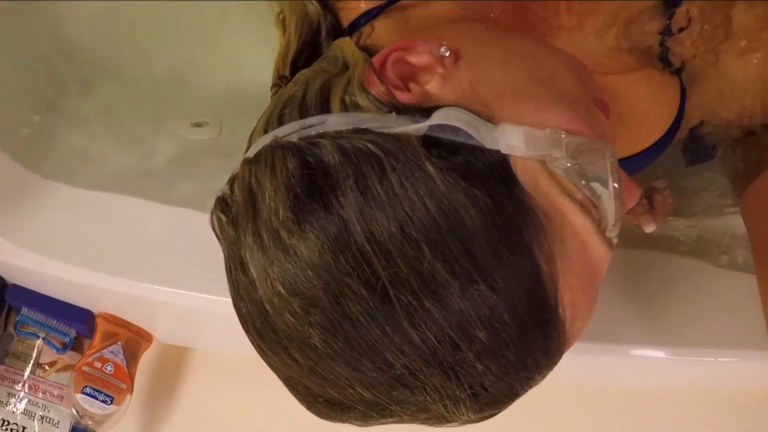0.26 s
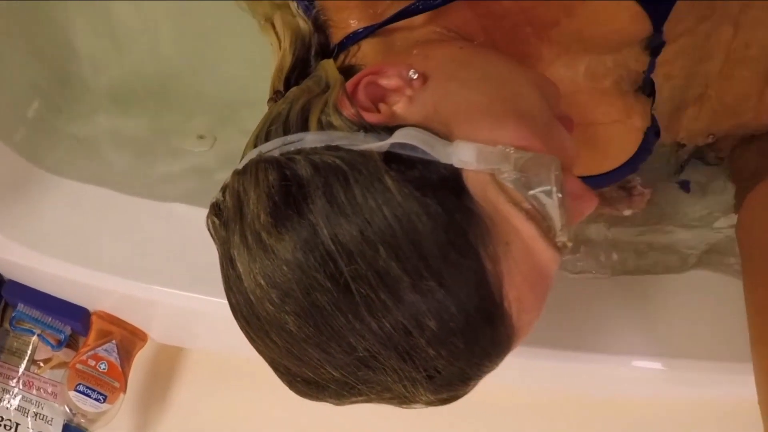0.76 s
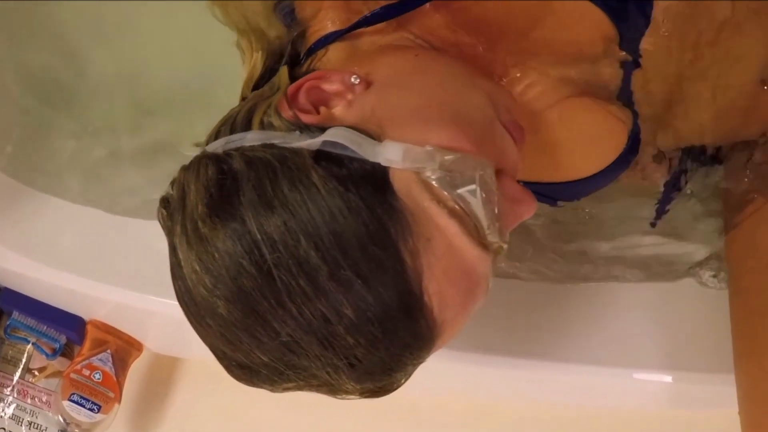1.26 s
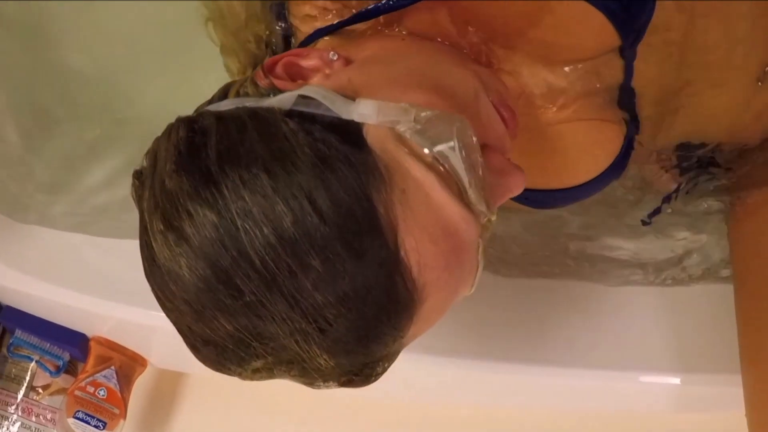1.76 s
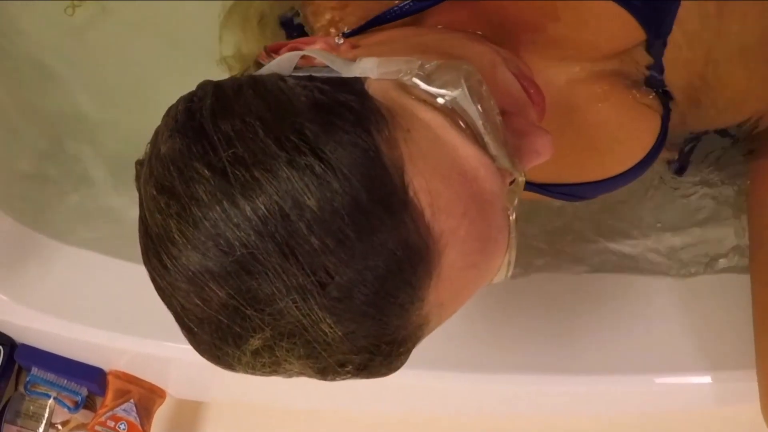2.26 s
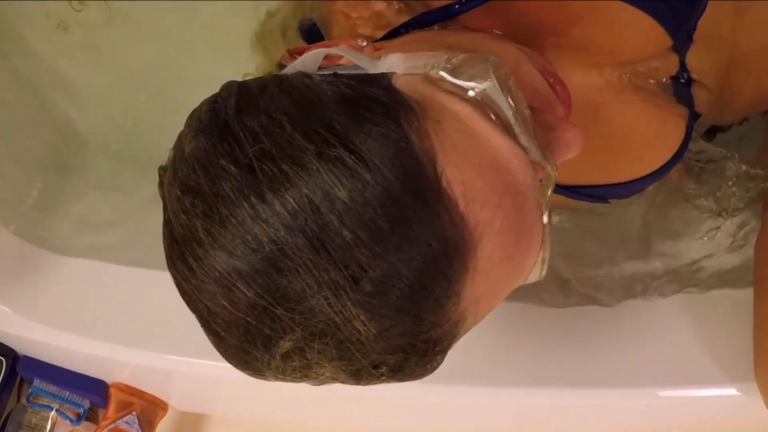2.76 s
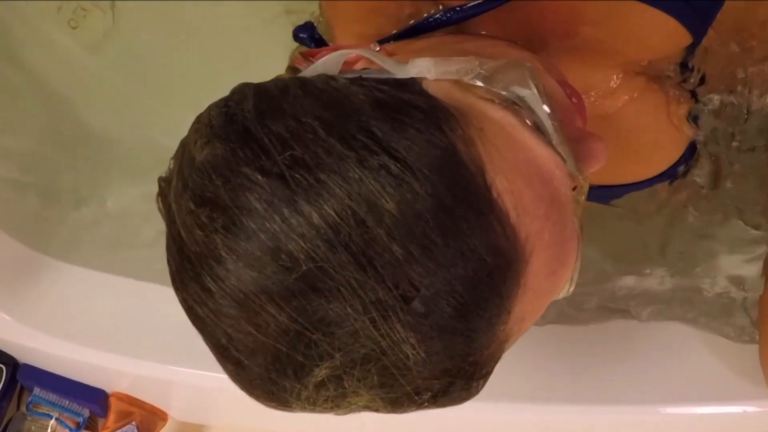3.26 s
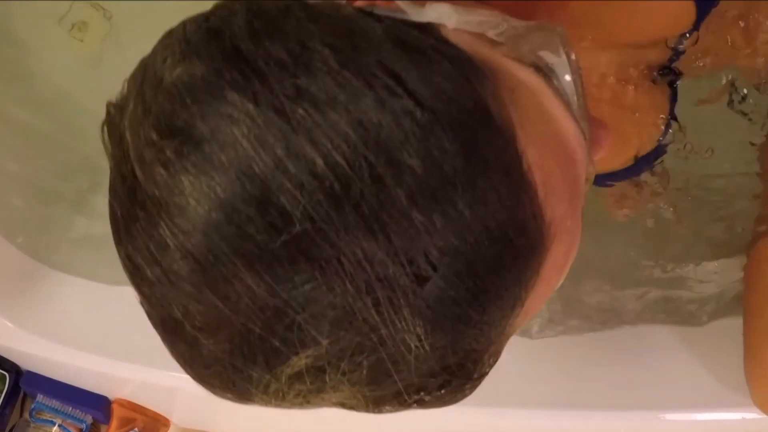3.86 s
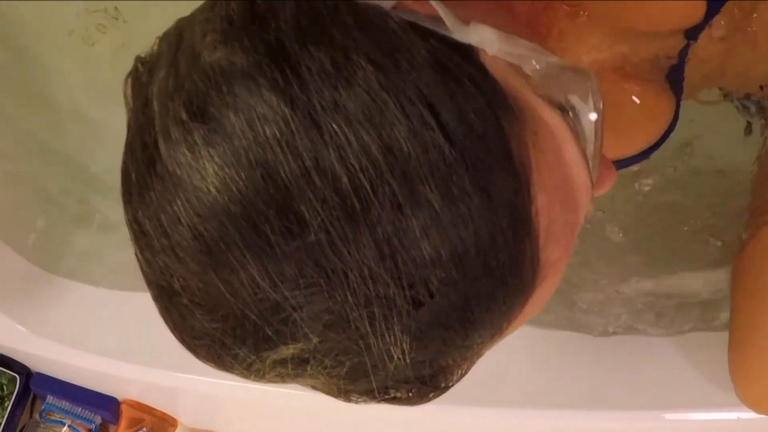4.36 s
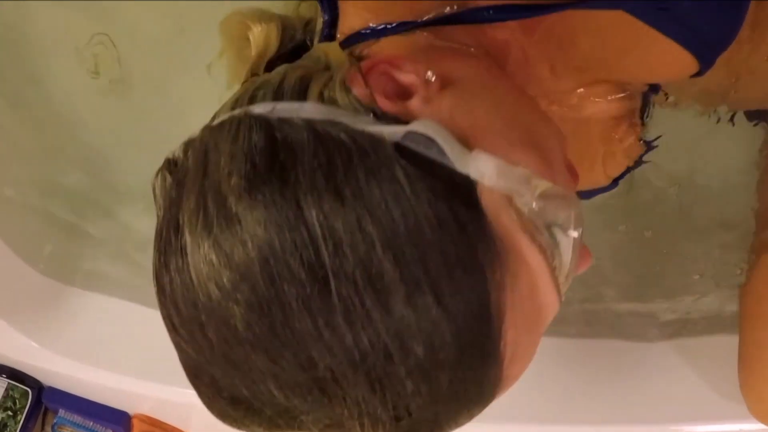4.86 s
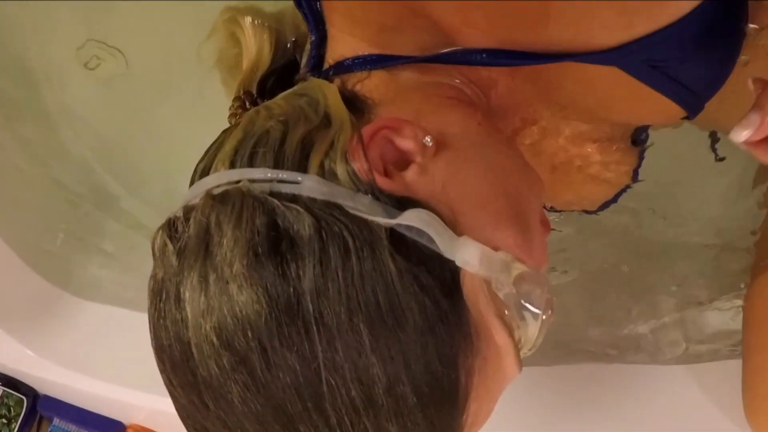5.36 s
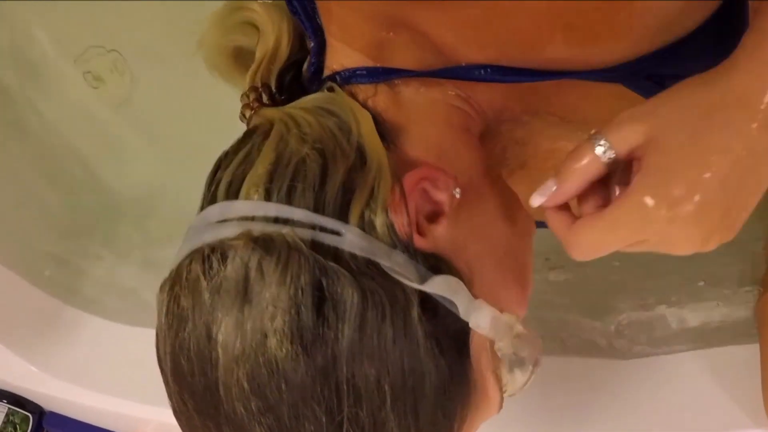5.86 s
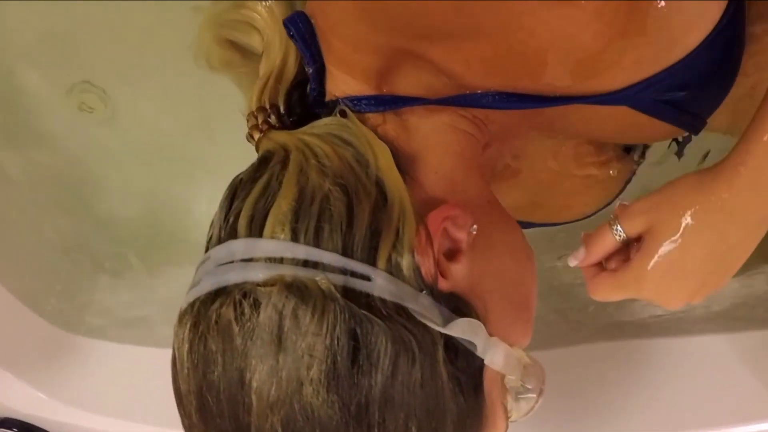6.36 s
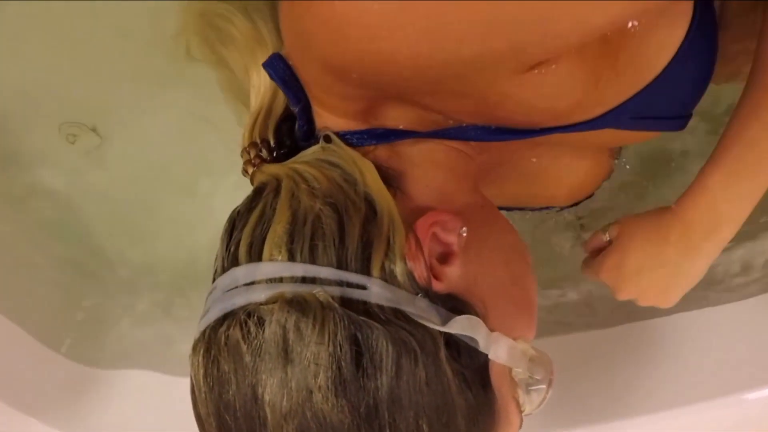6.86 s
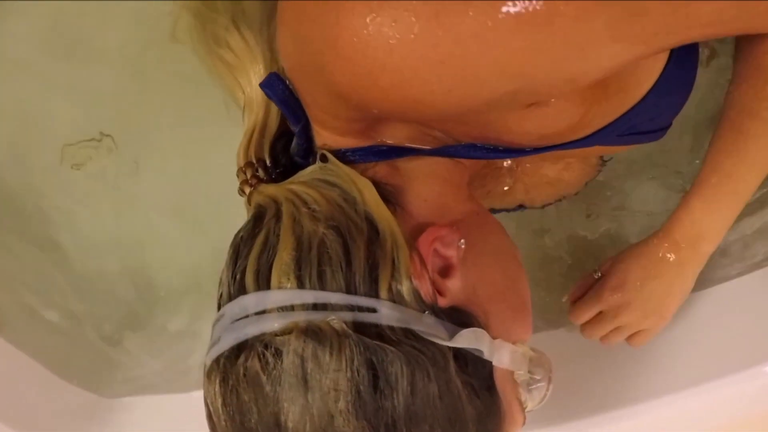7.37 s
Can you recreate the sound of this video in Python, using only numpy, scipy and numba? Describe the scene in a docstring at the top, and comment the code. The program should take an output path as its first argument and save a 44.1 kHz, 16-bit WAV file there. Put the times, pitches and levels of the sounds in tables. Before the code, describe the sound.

Quiet tub water trickles, swells into bubbling slosh, then breaks into crisp splashes and gulps, with bassy fingers-on-camera thumps over faint hiss.

```python
"""Turning over in a full bathtub

Someone turns over in the water close to a small hand-held camera with two microphone ports.
Water is a swarm of damped bubble tones and fizz, with plops, rising gulps, sharp drips and a thin hum;
decaying noise bands make the tiled room ring after them. Knocks excite low modes of the tub,
and fingers on the housing bump and rumble in the bass, over steady air noise and hiss."""
import sys
import numpy as np
from scipy import signal
from scipy.fft import rfft, irfft, next_fast_len
from scipy.io import wavfile
from scipy.ndimage import uniform_filter1d
from numba import njit

SR = 44100
rng = np.random.default_rng(int(sys.argv[2]) if len(sys.argv) > 2 else 0)


def attenuation_scalar(level_db):
    """Turn a level in dB into a linear amplitude multiplier (20 dB per decade)."""
    decades = np.asarray(level_db, float) / 20
    return 10 ** decades


def inscribe(sig):
    """Save sig as 16-bit PCM at rate SR to the path in sys.argv[1].

    A 1-D sig is mono; a 2-D sig holds one channel per row.
    Samples are clipped to [-1, 1] before scaling.
    """
    pcm = np.round(np.clip(np.atleast_2d(sig).T, -1, 1) * 32767)
    wavfile.write(sys.argv[1], SR, pcm.astype(np.int16))


N = 335145
T = np.arange(N) / SR  # time [s]
SIZE = next_fast_len(N + SR // 4)  # padded transform length
HZ = np.arange(SIZE // 2 + 1) * SR / SIZE + 1  # bin frequency, 1 Hz up so that its logarithm exists


def unit(x):
    """Normalisation: scales a signal to rms 1."""
    return x / np.sqrt(np.mean(x ** 2))


def colour(x, points):
    """Linear filtering: the spectrum is multiplied by a gain given at (frequency [Hz], gain [dB])."""
    hz, db = np.transpose(points)
    gain = attenuation_scalar(np.interp(np.log(HZ), np.log(hz), db))
    return irfft(rfft(x, SIZE) * gain, SIZE)[..., :N]


def sides(pan_db):
    """Level difference between ports: left and right gains from left minus right in dB."""
    return attenuation_scalar(np.array([pan_db, -pan_db]) / 2)


def walk(rate):
    """Slow random modulation: normal draws held for 1 / rate seconds, then smoothed twice."""
    k = int(SR / rate)
    held = np.repeat(rng.standard_normal(N // k + 1), k)
    return uniform_filter1d(uniform_filter1d(held, k), k)[:N]


@njit
def pings(out, start, hz, t60, rise, left, right, sr):
    """Damped oscillation: each sine swells over its first cycle, decays and may climb in pitch."""
    for e in range(len(start)):
        phase, f, a = 0., hz[e], 1.
        fall, climb = np.exp(-6.9 / (t60[e] * sr)), 2 ** (rise[e] / sr)
        for i in range(start[e], min(out.shape[1], start[e] + int(t60[e] * sr))):
            phase, f, a = phase + 2 * np.pi * f / sr, min(f * climb, sr / 3), a * fall
            v = a * np.sin(phase) * min(phase / (2 * np.pi), 1.)
            out[0, i] += left[e] * v
            out[1, i] += right[e] * v
    return out


def ring(s, db, hz, pan_db, t60, rise):
    """Superposition: the damped oscillations of many events add up; rise is in octaves per second."""
    left, right = attenuation_scalar(db) * sides(pan_db)
    start = (s * SR).astype(np.int64)
    return pings(np.zeros((2, N)), start, hz, np.clip(t60, .001, 1), rise, left, right, 1. * SR)


def spray(rows, count, late_s, low, high, drop_db, shorter):
    """Secondary bubbles: each event sheds quieter ones, low to high octaves off its pitch, just after it."""
    s, db, hz, pan_db, t60, rise = np.repeat(rows, count, axis=1)
    u = rng.random((len(s), 4)).T
    late = -late_s * np.log(u[0] + 0.00082)
    pitch = hz * 2 ** (low + (high - low) * u[2])
    level = db + drop_db - 8 * u[1] - 3 * late / late_s
    return ring(s + late, level, pitch, pan_db, t60 * shorter * (.5 + u[3]), rise)


# phase by which the left port leads the right: (frequency [Hz], lead [rad])
LEFT_LEAD = [(0, 0), (430, 1.7), (1210, .8), (1810, .2), (2330, .6), (3450, 1.7), (7400, 1.5)]


def ports(x):
    """Interaural-like phase: the right port hears the water with a frequency-dependent lag."""
    lag = np.exp(-1j * np.interp(HZ, *np.transpose(LEFT_LEAD)))
    return np.array([x[0], irfft(rfft(x[1], SIZE) * lag, SIZE)[:N]])


# spectral shape of the air and hiss: (frequency [Hz], gain [dB])
AIR_SPECTRUM = [(88, -59), (150, -2), (410, -20), (1360, -19.5), (1610, -17.5), (2130, -25), (3490, -23),
                (4930, -21.5), (6310, -31), (6970, -30.5), (7690, -40), (10000, -105), (16900, -120)]


def air():
    """Stationary noise: room air and microphone hiss, independent at the two ports."""
    return attenuation_scalar(-55.5) * unit(colour(rng.standard_normal((2, N)), AIR_SPECTRUM))


# reverberation of the tiles by band: (centre [Hz], t60 [s], level [dB])
TILE_BANDS = [(300, 0.53, -2), (810, 0.38, -2.5), (1800, 0.38, -2.5), (3600, 0.96, -3.5),
              (4960, 0.12, -1.5)]


def room(x):
    """Diffuse reverberation: convolution with exponentially fading noise bands, different at each port."""
    t = np.arange(SR * 3 // 4) / SR
    tail = 0
    for hz, t60, db in TILE_BANDS:
        sos = signal.butter(2, [hz / 1.59, hz * 1.7], "band", fs=SR, output="sos")
        band = signal.sosfilt(sos, rng.standard_normal((2, len(t))))
        band = band * 1000. ** (-t / t60) * np.clip(t / 0.0013, 0, 1)
        energy = np.sum(band ** 2) / 2 * SR / 2 / hz / np.sqrt(.5)  # evens out the bandwidths
        tail = tail + attenuation_scalar(db) * band / np.sqrt(energy)
    return signal.fftconvolve(x.mean(0)[None], tail)[:, :N]


# grip on the housing: (time [s], half the rumble amplitude [dB], left minus right [dB])
GRIP_RUMBLE = [(0.0, -54, 1), (0.22, -47, -6), (0.67, -54.5, -0.5), (0.93, -48.5, -9.5), (1.63, -56, 1),
               (2.2, -51, 0), (2.56, -50.5, -3.5), (4.2, -54, -4.5), (4.4, -47.5, -7), (5.06, -53.5, -2),
               (5.7, -47.5, -1), (5.95, -58, -3), (6.35, -37, -0.5), (6.69, -45.5, 2.5), (7.05, -48, 1),
               (7.26, -54.5, -2.5), (7.6, -45, 3.5)]
# finger bumps: (time [s], left level [dB], right level [dB])
FINGER_BUMPS = [(0.221, -12.5, -39), (0.288, -16.5, -23), (0.355, -19.5, -26), (1.986, -14.5, -25),
                (2.018, -21, -10.5), (2.056, -13.5, -21.5), (2.104, -14, -22), (2.131, -25, -12.5),
                (2.174, -14.5, -23.5), (2.213, -15.5, -23), (4.355, -11, -22), (4.536, -15, -27),
                (4.575, -24, -18.5), (4.736, -19, -20), (5.645, -16.5, -21.5), (5.73, -20, -27),
                (5.761, -14.5, -21.5), (5.798, -13.5, -17.5), (5.846, -18, -29.5), (6.159, -17, -29),
                (6.201, -11, -13.5), (6.232, -9.5, -17.5), (6.256, -19, -40), (6.306, -21, -26),
                (6.376, -15.5, -39), (6.422, -13, -18), (6.462, -12.5, -20.5), (6.498, -25, -12.5),
                (6.588, -29, -12), (6.621, -23, -17), (6.675, -19.5, -11.5), (6.746, -44, -13),
                (6.887, -15, -22), (7.016, -21, -41), (7.551, -17, -24)]
# spectral shape of the rumble: (frequency [Hz], gain [dB])
RUMBLE_SPECTRUM = [(18, -45), (30, -24.5), (62, -1.5), (108, 1), (135, -2), (214, -13), (500, -25),
                   (650, -38), (1100, -120)]
ROCK_HZ, BRISK_OCT_PER_DB, USUAL_BUMP_DB = 115.44, 0.1664, -10.5  # harder pushes rock faster


def grip():
    """Impulse response: short pushes rock the housing, opposite at the ports, over a creaking rumble."""
    out = np.zeros((2, N + SR))
    t = np.arange(SR // 20) / SR
    for s, left_db, right_db in FINGER_BUMPS:
        hz = ROCK_HZ * 2 ** (BRISK_OCT_PER_DB * (max(left_db, right_db) - USUAL_BUMP_DB))
        swell = t * hz / 0.2288
        rock = np.sin(2 * np.pi * hz * t) * swell * np.exp(1 - swell)
        # brisk pushes also tap
        rock += .5 * (hz / 135.2) ** 4 * np.sin(2 * np.pi * 330 * t) * np.exp(-t / 0.003)
        at = int(s * SR)
        out[:, at:at + len(t)] -= np.outer([attenuation_scalar(left_db), -attenuation_scalar(right_db)], rock)
    s, db, pan_db = np.transpose(GRIP_RUMBLE)
    a, b = rng.standard_normal((2, N)) * attenuation_scalar([4 * walk(30), 4 * walk(30)])  # creaks
    # each port hears a little of the other in opposite sign
    rumble = 2 * unit(colour(np.array([a - 0.19 * b, b - 0.065 * a]), RUMBLE_SPECTRUM))
    return out[:, :N] + rumble * attenuation_scalar(np.interp(T, s, db)) * sides(np.interp(T, s, pan_db))


# the body knocks the tub wall: (time [s], level [dB])
WALL_KNOCKS = [(0.861, -28.5), (0.905, -27.5), (0.929, -33.5), (0.967, -24.5), (1.006, -31.5)]
# low modes of the tub: (frequency [Hz], level re the knock [dB], t60 [s])
TUB_MODES = [(92.5, 3.5, 0.17), (117.4, 4, 0.07), (171.4, -6, 0.35), (262, -11.5, 0.069)]


def thuds():
    """Modal excitation: each knock rings the low modes of the tub, in phase at both ports."""
    s, db = np.repeat(np.transpose(WALL_KNOCKS), len(TUB_MODES), axis=1)
    hz, mode_db, t60 = np.tile(np.transpose(TUB_MODES), len(WALL_KNOCKS))
    return ring(s, db + mode_db, hz, -3.5 + 0 * s, t60, 0 * s)  # panned by -3.5 dB


# a thin tone that hums over the water: (start [s], end [s], level before its wavering [dB])
HUM_SPANS = [(1.25, 1.95, -61), (2.954, 4.1, -53.5)]
HUM_HZ, HUM_WIDTH_HZ, HUM_RISE_DB_PER_S, HUM_FALL_DB_PER_S = 881, 50, 130, 102.5


def hum():
    """Resonance: noise through one narrow line, which fades in, holds and fades out."""
    line = 1 / (1 + (2 * (HZ - HUM_HZ) / HUM_WIDTH_HZ) ** 2)
    tone = unit(irfft(rfft(rng.standard_normal(N), SIZE) * line, SIZE)[:N])
    level = 0
    for start, end, db in HUM_SPANS:
        fade_in = HUM_RISE_DB_PER_S * np.clip(start - T, 0, 9)
        fade_out = HUM_FALL_DB_PER_S * np.clip(T - end, 0, 9)
        level = level + attenuation_scalar(db - fade_in - fade_out)
    return tone * attenuation_scalar(3.0 * walk(15)) * level


# closing air pockets:
# (time [s], length [s], start frequency [Hz], rise [octaves], level before flutter [dB], left minus right [dB])
AIR_GULPS = [(0.669, 0.11, 282.7, 1.26, -38, -1), (3.607, 0.18, 334.8, 1.7, -35.5, 0.5),
             (4.295, 0.059, 744, 0.5, -34, -7), (4.304, 0.032, 449.5, 0.053, -29, -8.5),
             (4.351, 0.026, 391, 1.19, -34.5, -13), (4.427, 0.026, 387, 0.37, -39.5, -12),
             (4.453, 0.027, 454, 0.06, -19.5, -10), (4.514, 0.015, 1440, 0.22, -40, -5),
             (5.852, 0.074, 481, 0.98, -48.5, 1), (6.195, 0.032, 397.3, 0.02, -27.5, -5.5),
             (6.286, 0.024, 624, 0.027, -32.5, 0), (6.41, 0.042, 359.5, 0.063, -39, -6),
             (6.6556, 0.03, 929, 0.48, -27, 1.5), (6.66, 0.03, 797, 0.4, -32.5, 6.5),
             (6.681, 0.02, 1350, 0.25, -43, -0.5), (6.91, 0.044, 381.3, 0.068, -26.5, -7.5),
             (6.94, 0.058, 401.6, 0.13, -38.5, 0.5), (7.186, 0.082, 438.4, 0.1, -42.5, -3.5),
             (7.254, 0.057, 521, 1.13, -50.5, 7)]
GULP_ATTACK_S, GULP_CLOSING_SHARE, GULP_FROTH_DB = 0.0018, 0.2, -11


def gulps():
    """Shrinking cavity: an air pocket sings upward, fluttering and frothy, and stops as it closes."""
    out = np.zeros((2, N))
    flutter = attenuation_scalar(1.2 * walk(150))
    waver = 0.047 * walk(120)  # octaves
    froth = attenuation_scalar(GULP_FROTH_DB) * unit(walk(500))
    for s, length, hz, rise, db, pan_db in AIR_GULPS:
        at = slice(int(s * SR), int((s + length) * SR))
        x = np.linspace(0, 1, at.stop - at.start)  # share of the gulp elapsed
        phase = 2 * np.pi * np.cumsum(hz * 2 ** (rise * x ** 1.1 + waver[at])) / SR
        opening = np.clip(x * length / GULP_ATTACK_S, 0, 1)
        closing = np.clip((1 - x) / GULP_CLOSING_SHARE, 0, 1)
        out[:, at] += np.outer(attenuation_scalar(db) * sides(pan_db), opening * closing * np.sin(phase))
    return out * flutter * (1 + froth)


# bubble plops: (time [s], level [dB], frequency [Hz], left minus right [dB], t60 [s])
BUBBLE_PLOPS = [(0.169, -47.5, 1230, 9, 0.072), (.672, -45.5, 585, 9, 0.19), (0.697, -53, 1636, -2, 0.42),
                (0.774, -39, 777.7, 5, 0.13), (0.883, -32.5, 293, -17, 0.061), (1.256, -42, 1114, 3, 0.059),
                (1.298, -47, 1037, 3, 0.12), (2.821, -32.5, 576, 10.5, 0.1), (2.838, -32, 657, 5, 0.16),
                (3.025, -27, 455.4, 5, 0.15), (3.108, -29, 837, 3, 0.065), (3.107, -32.5, 252, -3.5, 0.36),
                (3.287, -34.5, 264, -2, 0.29), (3.307, -35, 1140, 9.5, 0.12), (3.355, -24.5, 1048, 7, 0.07),
                (3.375, -25, 475, 4, 0.044), (3.471, -34, 910, 3, 0.15), (3.399, -25.5, 600, 4, 0.056),
                (3.574, -26, 661, 10.5, 0.079), (3.625, -28, 846, 8, 0.085), (3.686, -24.5, 792, 5, 0.11),
                (3.719, -33.5, 665, 5, 0.17), (4.027, -40.5, 452, -4.5, 0.34),
                (4.064, -33, 912, 5.5, 0.068), (4.157, -38, 825, -15, 0.19),
                (4.292, -28.5, 601, -16.5, 0.06), (4.404, -18.5, 777, -6.5, 0.047),
                (4.446, -17, 610, 2, 0.03), (4.456, -21.5, 817, -13, 0.054), (4.483, -28.5, 516, 6, 0.026),
                (4.502, -21.5, 950, -14.5, 0.024), (4.52, -33.5, 897, -12, 0.088),
                (4.528, -30.5, 536, 2, 0.21), (4.748, -43, 564, -10, 0.37), (4.806, -42, 1232, -2, 0.1),
                (4.857, -36.5, 546, -5, 0.29), (4.887, -37.5, 1206, 1.5, 0.11),
                (4.942, -39.5, 1243, -1, 0.058), (4.978, -41.5, 824, -3, 0.088),
                (5.472, -44, 1026, 3.5, 0.09), (5.708, -29, 326, -5.5, 0.38), (5.82, -43, 315.8, -5, 0.17),
                (6.165, -24, 1156, -0.5, 0.049), (6.192, -4.5, 1578, -3, 0.015),
                (6.196, -11.5, 647, -2, 0.011), (6.279, -29.5, 1120, 2, 0.044),
                (6.329, -33, 1193, 2, 0.095), (6.358, -23.5, 1076, 3.5, 0.048),
                (6.368, -30.5, 1293, -2.5, 0.051), (6.39, -36.5, 626, 4, 0.072),
                (6.405, -35.5, 1140, 0, 0.08), (6.795, -28.5, 314, -3, 0.19), (6.797, -16, 736, 3, 0.016),
                (6.956, -33, 893, 5, 0.079), (7.174, -33, 445, 9.5, 0.04), (7.198, -40, 783, 3, 0.1)]
PLOP_RISE_OCT_PER_S = 1.6


def plops():
    """Bubble resonance: large bubbles ring and climb in pitch, each with quieter followers."""
    columns = np.transpose(BUBBLE_PLOPS)
    rows = np.array([*columns, PLOP_RISE_OCT_PER_S + 0 * columns[0]])
    return ring(*rows) + spray(rows, late_s=0.018, low=-0.0092, high=0.62, drop_db=-3, shorter=0.17, count=5)


# drips and slaps: (time [s], ring level before the port filter [dB], ring frequency [Hz],
# left minus right [dB], crack level re the ring, before scaling and colouring [dB])
DRIP_IMPACTS = [(0.213, -43, 2360, 0, 6), (0.218, -38.5, 3720, -4.5, -6.5),
                (0.2407, -32.5, 2920, -4.5, 7.5), (0.287, -32, 1300, 1, -6.5), (0.304, -44, 2310, 1.5, 15),
                (0.317, -36, 1450, 2, 0.5), (0.317, -23.5, 2900, -2.5, -5.5),
                (0.321, -23.5, 3740, -4.5, 1.5), (0.324, -21, 3420, 0, 3.5), (0.338, -30, 3930, -2, -10),
                (0.352, -28.5, 3870, 1, -9.5), (0.394, -30.5, 3370, 1, -5), (.512, -40, 2140, 0.5, -3.5),
                (.54, -39.5, 1940, -4, -2.5), (.688, -40.5, 2310, -1, -13), (0.695, -38, 2920, -3, -4),
                (0.856, -37.5, 2140, -2, -5), (0.876, -40.5, 1400, -8, 12), (0.888, -33.5, 1163, 1, 5.5),
                (0.98, -37, 1940, -2, 2), (1.267, -36.5, 3930, -3, -4), (1.472, -41, 3060, 1, -2),
                (1.522, -34.5, 1240, -3, -0.5), (1.765, -41, 2870, -5, -7), (1.99, -37, 3420, -10, -4.5),
                (2.04, -39, 1660, -1.5, 1), (2.0832, -30.5, 1650, 0.5, 6), (2.395, -41.5, 3527, -10.5, 3.5),
                (2.83, -33, 3922, -3, 5.5), (2.8512, -30, 1500, 1, -3.5), (2.852, -32.5, 2070, 0.5, -1.5),
                (2.925, -34, 2663, -4, -11.5), (2.954, -36, 2600, -6, 0.5), (3.026, -34.5, 990, 4, 0.5),
                (3.108, -28.5, 1980, 3, -10), (3.288, -34.5, 1460, 4, -1), (3.113, -28, 1537, 3.5, -17),
                (3.358, -29.5, 1480, 13.5, -5.5), (3.368, -29.5, 1770, 6, -8),
                (3.378, -29.5, 3600, -4, -6.5), (3.419, -31, 2340, 1, -10.5), (3.495, -32, 2470, 1, -10),
                (3.5299, -28, 1470, 2, 5.5), (3.57, -27, 3780, -4, 0), (3.625, -31, 3610, -3.5, -19),
                (3.645, -24.5, 3030, -4.5, -11), (3.766, -24, 3090, 0, -7), (3.779, -29, 1520, 11.5, -19),
                (3.918, -26, 1197, 9, -13.5), (3.9866, -26, 1664, 0, 6.5), (4.0606, -25.5, 2090, 2, 5),
                (4.1648, -37, 2520, -16, 6.5), (4.1848, -32, 3000, -15, 13.5),
                (4.321, -38, 4320, -12.5, 11.5), (4.347, -27, 3464, -16, 7), (4.354, -36.5, 2400, -12, 7),
                (4.4135, -26, 2810, -13.5, 4), (4.446, -27.5, 2910, -16.5, 11.5),
                (4.518, -31.5, 3250, -15, -1.5), (4.535, -38, 3430, -10, 6.5), (4.5584, -26, 1660, -10, -1),
                (4.638, -35, 3940, -13, -6), (4.7546, -33, 1780, -5.5, 10), (4.761, -22, 1530, -4.5, -6.5),
                (4.7619, -15, 3566, -18, -4), (4.818, -26, 1410, 0, -7), (4.8722, -26.5, 2960, -9, -18),
                (5.023, -25.5, 4200, -8, 3), (5.035, -32.5, 3150, -8, 3.5), (5.233, -36, 1684, 3.5, -9),
                (5.235, -33, 3080, -9.5, -1), (5.4193, -32, 1470, 4.5, -9.5),
                (5.695, -31.5, 1215, -2.5, -3.5), (5.696, -39.5, 1730, 2, -5),
                (6.064, -38.5, 3187, -5.5, -7), (6.142, -37.5, 2240, -5, -2.5), (6.1646, -22, 3070, -7, 7),
                (6.1645, -31, 3720, -4, 4), (6.165, -26.5, 1750, -0.5, -1.5), (6.181, -34, 2065, -2.5, -3),
                (6.183, -19.5, 3320, -4.5, 0), (6.192, -21.5, 1546, 4, 7.5),
                (6.1917, -16, 3800, -11.5, -7.5), (6.207, -28.5, 1820, 1.5, -11.5),
                (6.221, -25.5, 1420, -5.5, -11.5), (6.229, -27, 1566, 1.5, -7.5),
                (6.238, -33, 3520, -6.5, -10), (6.247, -31, 1580, 0, -7), (6.281, -25.5, 2760, -6.5, -7),
                (6.289, -20, 3600, -5, -9), (6.298, -20.5, 3210, -8.5, -1), (6.316, -39.5, 3100, -8, -5),
                (6.33, -32, 3600, -6.5, -4.5), (6.356, -26, 3010, -2.5, -10.5),
                (6.448, -24, 3530, -14, 0.5), (6.782, -35, 2520, 2.5, 0.5), (6.797, -25, 3480, -1, 7.5),
                (6.815, -24, 3600, -3.5, -0.5), (6.858, -32.5, 3000, -3, -9), (6.902, -28, 1427, 8, -15),
                (6.9865, -32, 2400, -6, -4), (7.179, -34, 1200, 3.5, 1.5), (7.288, -36.5, 3450, -4.5, -12),
                (7.323, -35, 2600, -6, 4), (7.326, -30, 1880, 0.5, 11)]
# the small ports dull the top of the rings: (frequency [Hz], gain [dB])
PORT_RESPONSE = [(100, -16.5), (3900, -1.5), (4600, -25.5), (6500, -19.5), (8000, -21.5)]
# spectral shape of the cracks: (frequency [Hz], gain [dB])
CRACK_SPECTRUM = [(500, -28.5), (1000, -15.5), (1600, -2), (2300, -2), (3500, 4.5), (4500, -2), (6000, -17),
                  (7500, -26), (16000, -53)]
DRIP_CYCLES = 49.3  # cycles until a ring is 60 dB down


def drips():
    """Impact sound: a short ring, a broadband crack and flying droplets at each drip."""
    s, db, hz, pan_db, crack_db = np.transpose(DRIP_IMPACTS)
    rows = np.array([s, db, hz, pan_db, DRIP_CYCLES / hz, 0 * s])
    cracks = np.zeros((2, N + 1024))
    t = np.arange(1024) / SR
    fade = np.exp(-t / .0015) + .15 * np.exp(-t / .008)
    starts = (s * SR).astype(int)
    gains = (attenuation_scalar(db + crack_db) * sides(pan_db)).T
    for i, gain, noise in zip(starts, gains, rng.standard_normal((len(s), 1024))):
        cracks[:, i:i + 1024] += np.outer(gain, 0.095 * unit(noise * fade))
    droplets = spray(rows, late_s=.012, low=-0.34, high=0.38, drop_db=-7.0, shorter=0.83, count=6)
    return colour(ring(*rows) + droplets, PORT_RESPONSE) + colour(cracks[:, :N], CRACK_SPECTRUM)


def swarm(count, size, low_hz, high_hz, cycles, spread_db, rise, scatter_db, clump_s):
    """Poisson-like clustering: clumps share a moment, a place and roughly a pitch; few are loud.

    Each of the count clumps holds size bubbles, which climb by rise octaves per t60."""
    clump = np.repeat(rng.random((count, 4)), size, axis=0).T
    u = rng.random((count * size, 4)).T
    hz = low_hz * (high_hz / low_hz) ** clump[1] * 2 ** (0.841 * (u[1] - .5))
    t60 = cycles * (.5 + u[2]) / hz
    db = -spread_db * np.log(clump[2] + 0.0099) - 10 * u[3]
    s = clump[0] * N / SR - clump_s * np.log(u[0] + 0.0012)
    return ring(s, db, hz, scatter_db * (2 * clump[3] - 1), t60, rise / t60)


def rush(bubbles, db, apart):
    """Statistical limit: bubbles too many to tell apart become noise, partly different at the ports."""
    mid, side = rng.standard_normal((2, N))
    return unit(bubbles) + attenuation_scalar(db) * unit(np.array([mid + apart * side, mid - apart * side]))


# splashes throw up fizz: (time [s], level before attack and fall [dB])
SPLASH_BURSTS = [(0.317, -46), (2.829, -54.5), (3.109, -61), (3.355, -58), (4.762, -51.5), (6.197, -42.5),
                 (6.275, -43.5), (6.445, -54), (6.79, -38)]
SPLASH_ATTACK_S, SPLASH_FALL_DB_PER_S = 0.012, 98.5


def splashes():
    """Exponential decay: the gain of thrown-up fizz starts quickly at each splash and dies away."""
    thrown = 0
    for at, db in SPLASH_BURSTS:
        attack = np.clip((T - at) / SPLASH_ATTACK_S, 0, 1)
        thrown = thrown + attack * attenuation_scalar(db - SPLASH_FALL_DB_PER_S * np.abs(T - at))
    return thrown


# moving water: (time [s], swarm level [dB], fizz level [dB], left minus right [dB]), before random wavering
WATER_MOTION = [(0.0, -54.5, -61.5, -1.5), (0.271, -54.5, -60.5, 1), (0.6, -60.5, -78, -0.5),
                (0.87, -54, -63, -1.5), (1.571, -56.5, -56, -1.5), (2.33, -63.5, -72.5, -0.5),
                (2.73, -51.5, -53, -0.5), (3.0, -47.5, -52, -2.5), (3.45, -39.5, -43.5, -1),
                (3.75, -42, -46.5, -2), (4.201, -51, -49.5, -1.5), (4.4, -43.5, -50.5, -10.5),
                (4.72, -54.5, -62, -4), (4.91, -49.5, -49.5, -6.5), (5.1, -57.5, -73, -1),
                (5.46, -63, -62, -3.5), (5.8, -52.5, -62.5, 3.5), (6.19, -64, -61.5, -6),
                (6.33, -44.5, -61, -0.5), (6.6, -52, -88.5, 0.5), (6.78, -52, -61, -1),
                (6.9, -38, -55, 1.5), (7.069, -52, -72, -3.5), (7.6, -59.5, -55, 1)]
# spectral shapes of swarm, fizz and the dense spray of a splash: (frequency [Hz], gain [dB])
SWARM_SPECTRUM = [(120, -56), (200, -8), (252, -7), (457, 2.5), (530, 2), (816, 5), (1800, -2),
                  (2340, -47.5), (3960, -120)]
FIZZ_SPECTRUM = [(530, -41.5), (900, -7.5), (1070, -13), (1300, -24.5), (1530, -13.5), (1780, -10),
                 (2530, -10), (2940, -3.5), (3650, -5), (4290, -12.5), (6780, -32), (7690, -57.5),
                 (10000, -92), (16900, -120)]
MIST_SPECTRUM = [(1900, -31.5), (2900, -0.5), (3850, 1), (4400, -6.5), (5300, -12.5), (6800, -31.5)]


def slosh():
    """Collective bubble sound: a swarm below and fine fizz above, both carried by the turning body."""
    s, *columns = np.transpose(WATER_MOTION)
    swarm_db, fizz_db, pan_db = (np.interp(T, s, c) for c in columns)
    low = swarm(count=2200, size=3, low_hz=220, high_hz=1700, cycles=16, spread_db=2.2,
                rise=.4, scatter_db=4, clump_s=.015)
    low = unit(colour(rush(low, db=-10, apart=0.38), SWARM_SPECTRUM))
    high = swarm(count=4000, size=3, low_hz=1048, high_hz=7840, cycles=38, spread_db=1.5,
                 rise=0.23, scatter_db=6.0, clump_s=.006)
    high = unit(colour(rush(high, db=-7, apart=0.49), FIZZ_SPECTRUM))
    thrown = splashes()
    mist = attenuation_scalar(-1.5) * unit(colour(rng.standard_normal((2, N)), MIST_SPECTRUM)) * thrown
    body = low * attenuation_scalar(swarm_db + 2.0 * walk(12))
    fizz = high * (attenuation_scalar(fizz_db) + thrown) * attenuation_scalar(3.03 * walk(15))
    return (mist + body + fizz) * sides(pan_db)


def scene():
    """Superposition of sources: water direct and off the tiles, with the tub, the grip and the air."""
    water = hum() + gulps() + plops() + drips() + slosh()
    return air() + room(water) + grip() + thuds() + ports(water)


def roll_off(x):
    """The treble ends steeply here."""
    return signal.sosfilt(signal.butter(12, 7700, fs=SR, output="sos"), x)


def record(dry):
    """Band limiting: the camera cuts the deep bass and the top."""
    x = signal.sosfilt(signal.butter(8, 69, "high", fs=SR, output="sos"), dry)
    x = signal.sosfilt(signal.butter(4, 7600, fs=SR, output="sos"), x)
    return roll_off(x)


dry = scene()
out = record(dry)
inscribe(out)
```